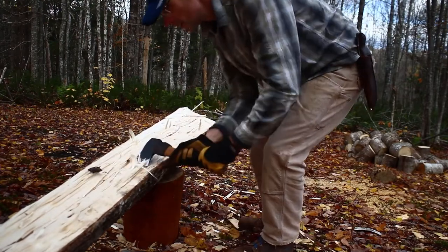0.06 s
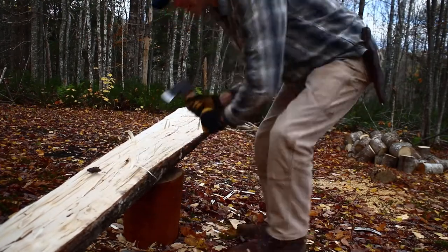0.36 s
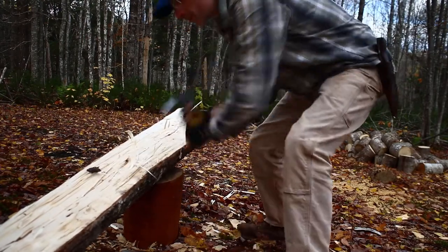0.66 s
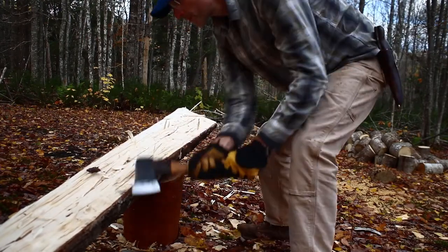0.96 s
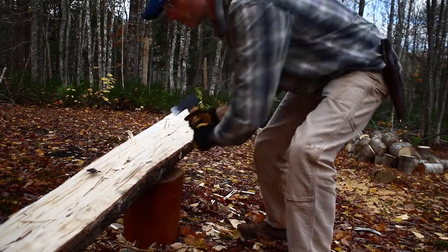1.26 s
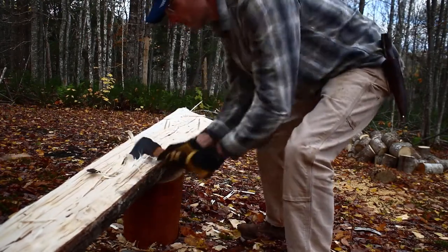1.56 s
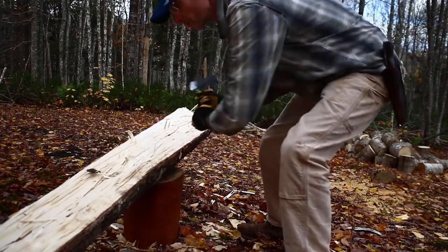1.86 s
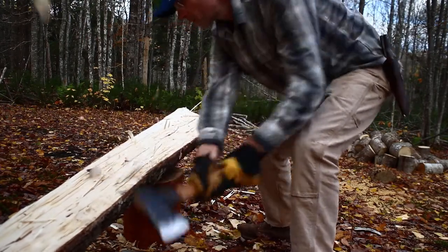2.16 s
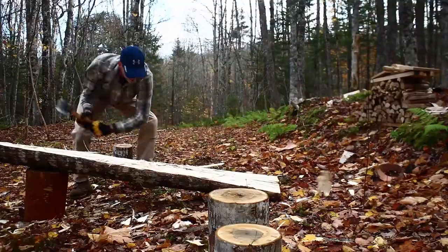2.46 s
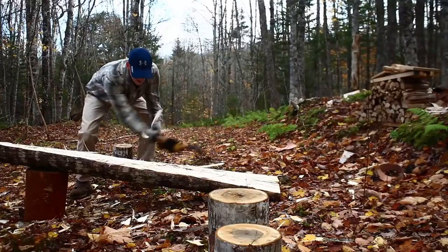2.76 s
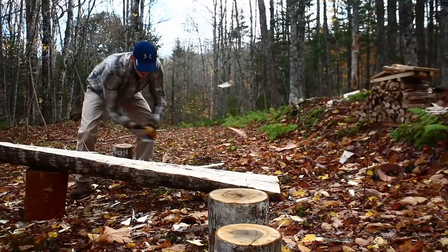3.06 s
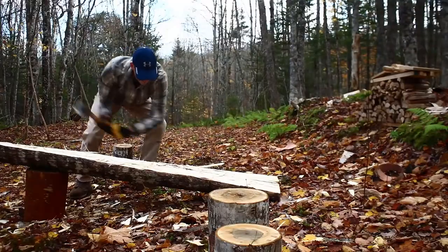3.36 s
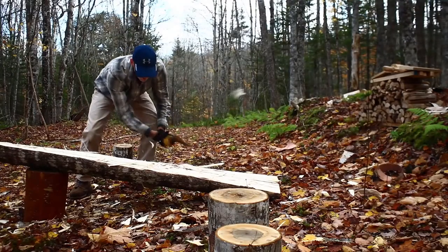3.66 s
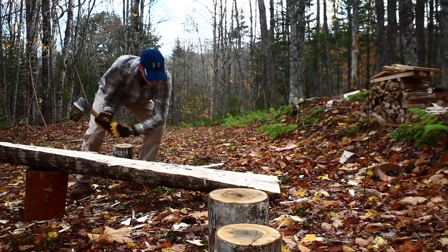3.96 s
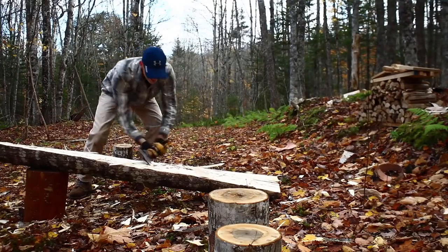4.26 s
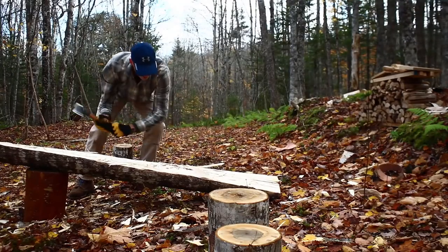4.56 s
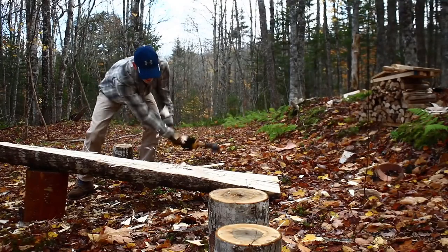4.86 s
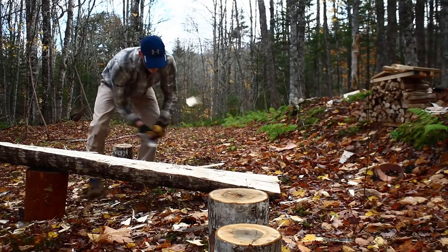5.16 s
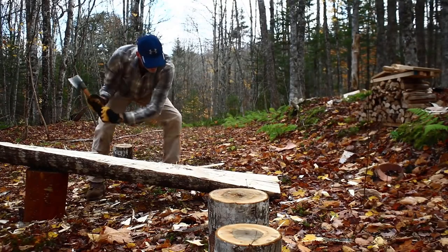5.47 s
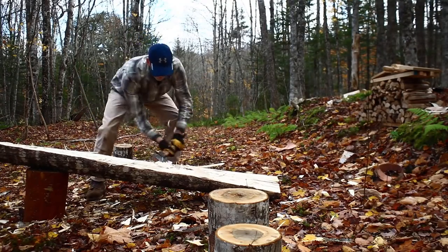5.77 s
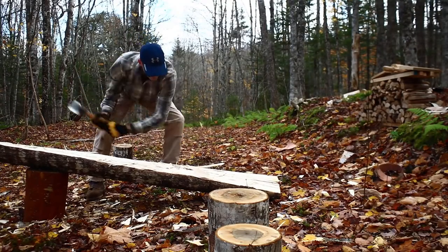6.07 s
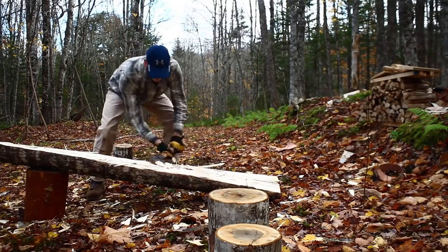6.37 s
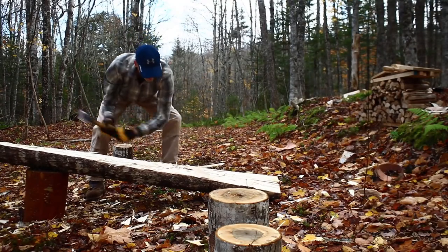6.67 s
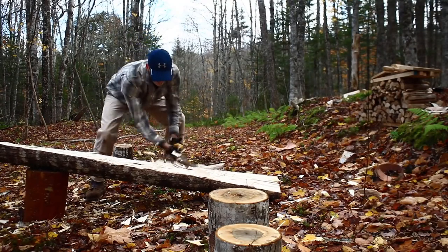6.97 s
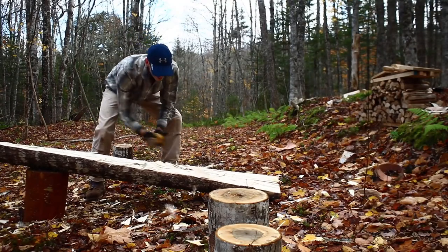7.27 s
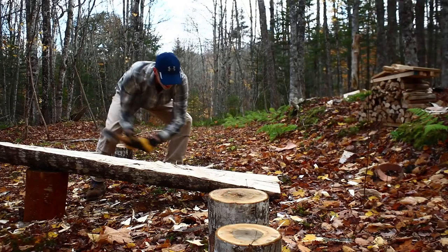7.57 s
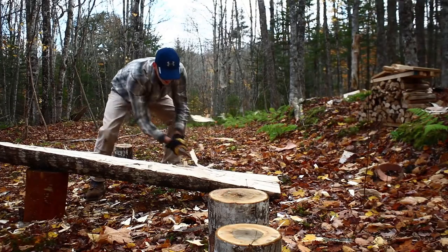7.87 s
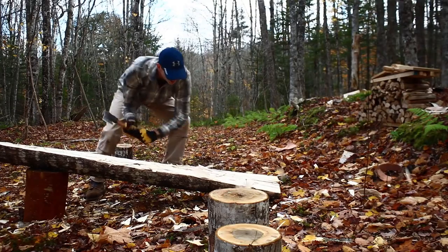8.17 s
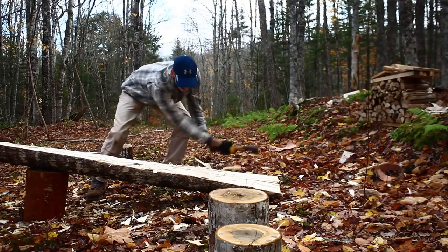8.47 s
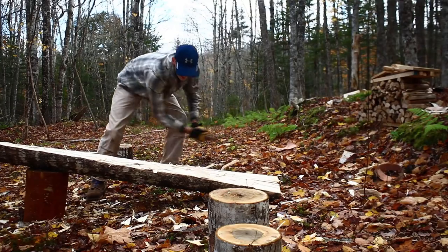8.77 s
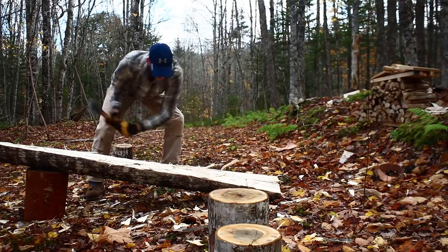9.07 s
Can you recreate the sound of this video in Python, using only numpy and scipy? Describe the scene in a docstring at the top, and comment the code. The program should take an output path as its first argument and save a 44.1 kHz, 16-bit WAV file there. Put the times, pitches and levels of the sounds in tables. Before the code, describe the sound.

Evenly spaced hatchet strikes bite into a log in quiet woods, close and heavy at first, then lighter and farther off.

```python
"""Twelve hatchet chops hew a wet log propped on stumps in an autumn wood.
Each impact excites the log's damped modes and knocks a slab loose; fibres then tear and snap
as the chip splits off along the grain. Chips drop into dry leaves, clothes and boots stir
between swings, and ground and trunks scatter a faint echo over a steady hush of air."""
import sys
import numpy as np
from scipy import signal
from scipy.fft import rfft, irfft
from scipy.io import wavfile

SR = 44100
rng = np.random.default_rng(int(sys.argv[2]) if len(sys.argv) > 2 else 0)


def master(y):
    """Save y as 16-bit WAV."""
    cut = np.clip(np.atleast_2d(y).T, -1, 1)
    pcm = np.round(cut * 32767)  # scale
    wavfile.write(sys.argv[1], SR, pcm.astype(np.int16))


N = 406161

# The log is struck, the blade is worked free, or the log rocks and rings faintly; a chop may catch
# twice. Each row: start in seconds, knock pitch in Hz, knock level in dB, log level in dB, frequency
# favoured by the point of contact in Hz, its boost in dB, tearing level in dB, tearing length in
# seconds. Levels in all tables are relative.
BLOWS = [(0.001, 1450, -56, -56.5, 377, 22, -58, 0.037), (0.7189, 816, -16, -26, 290, 8, -21.5, .016),
         (0.7363, 880, -16.5, -16, 267.1, 2, -18, .02), (1.378, 888, -14, -25, 600, 3.5, -19, .011),
         (1.629, 900, -49, -61.5, 560, 10, -42, .016), (1.791, 865, -52, -67, 650, 2, -50, .006),
         (2.009, 1205, -10.5, -16.5, 765, 2.5, -12.5, .012), (2.021, 878, -18.5, -15.5, 395, 7, -29, 0.02),
         (2.6704, 1552, -14, -32.5, 390, 7.5, -15, .009), (2.683, 1052, -15, -34, 430, 13.5, -32.5, .004),
         (3.452, 1454, -9.5, -29.5, 450, 5.5, -7.5, .004), (4.139, 1550, -16.5, -38, 516, 4.5, -15, .006),
         (4.737, 1098, -20.5, -33.5, 650, 3, -20.5, 0.017), (5.669, 1404, -15.5, -31, 267, 2.5, -14, .011),
         (5.679, 1094, -18.5, -31, 421, 12.5, -24, 0.01),
         (6.276, 1455, -21.5, -39, 186, 8.5, -14.5, 0.0084), (6.890, 1900, -33, -53, 186, 3, -26.5, 0.015),
         (6.904, 1428, -26.5, -33, 475, 4, -14.5, 0.012),
         (7.015, 1500, -40.5, -60, 377, 16.5, -32.5, 0.0086),
         (7.634, 1407, -31.5, -41, 365, 18.5, -24, 0.017), (8.341, 1446, -15.5, -36.5, 267, 8, -16.5, .004),
         (8.3488, 1377, -12, -26.5, 800, 12.5, -21, .003)]
# The log's normal modes. Each row: frequency in Hz, level in dB, 60 dB decay time in seconds.
LOG_MODES = [(186, -2, 0.2), (268, -3.5, 0.17), (307, -4.5, 0.11), (379.6, -3.5, 0.24), (445, 1, .19),
             (493, -9.5, 0.16), (584, -1.5, 0.14), (654, 1, .125), (781, -12, 0.11), (863.7, -7, 0.068)]
CLOSE_UNTIL_S = 2.45   # the first three chops are heard beside the log


def from_db(db):
    """Amplitude ratio of a level in decibels."""
    return 10 ** (np.asarray(db) / 20)


def unit_rms(x):
    """Normalisation to unit mean power."""
    return x / np.sqrt(np.mean(x ** 2) + 1e-20)


def seconds(length):
    """Sample times over a length in seconds."""
    return np.arange(int(length * SR)) / SR


def fade(t, t60):
    """Exponential decay from time zero on, by 60 dB in t60 seconds."""
    return np.exp(-np.log(1000) * np.maximum(t, 0) / max(t60, 1e-4))


def rise(t, time_constant):
    """First-order growth towards one."""
    return 1 - np.exp(-t / time_constant)


def add(out, start, sound):
    """Superposition: a sound joins the mix at its start in seconds."""
    i = max(int(start * SR), 0)
    out[i:i + len(sound)] += sound[:max(N - i, 0)]


def at_hz(points, hz):
    """Interpolation of a curve along a logarithmic frequency axis."""
    points = np.array(points)
    return np.interp(np.log(hz + 1), np.log(points[:, 0]), points[:, 1])


def coloured(x, spectrum, tilt_db=0):
    """Spectral shaping to unit rms, with a tilt per octave above 1 kHz."""
    hz = np.fft.rfftfreq(len(x), 1 / SR)
    gain_db = at_hz(spectrum, hz) + tilt_db * np.log2(np.maximum(hz, 1000))
    return unit_rms(irfft(rfft(x) * from_db(gain_db), len(x)))


def band(x, low_hz, high_hz, order=1):
    """Butterworth band-pass filtering."""
    edges = [min(low_hz, .3 * SR), min(high_hz, .45 * SR)]
    return signal.sosfilt(signal.butter(order, edges, "band", fs=SR, output="sos"), x)


def band_noise(t, low_hz, high_hz, order=1):
    """Band-limited Gaussian noise of unit rms."""
    return unit_rms(band(rng.standard_normal(len(t)), low_hz, high_hz, order))


def grains(size, per_s, spread_db):
    """Shot noise: random impulses of very unequal strength."""
    impulses = rng.standard_normal(size) * (rng.random(size) < per_s / SR)
    return impulses * from_db(spread_db * np.minimum(rng.exponential(1, size), 4))


def flutter(t, per_s, depth_db):
    """Random amplitude modulation: a gain that glides between per_s levels a second."""
    return from_db(depth_db * np.interp(t * per_s, np.arange(len(t)), rng.standard_normal(len(t))))


def air(level_db=-68.5):
    """Stationary noise, strongest at low frequencies, makes the hush of the air."""
    # The air's spectrum. Each row: frequency in Hz, level in dB.
    spectrum = [(15, -29.5), (25, 1.5), (61, 3.5), (309, 1.5), (439, -0.5), (489, 2.5), (591, 0.5),
                (1440, 0), (1740, -5), (13600, -10), (16000, -19)]
    return from_db(level_db) * coloured(rng.standard_normal(N), spectrum)


def woodland_echo(x, near_t60=0.4, near_rise_s=0.004, far_rise_s=0.08):
    """Scattering: nearby ground and stumps answer at once, while echoes from the trunks build slowly."""
    # The scattered sound. Each row: frequency in Hz, near level in dB, far level in dB,
    # far 60 dB decay time in seconds.
    scatter = [(100.34, -26, -39.5, .8), (420, -24.5, -32, 0.64), (739.5, -21.5, -24.5, 0.69),
               (1300.3, -27.5, -34.5, 0.93), (2300, -20.5, -28.5, 0.89), (3960, -19.5, -28.5, 0.48),
               (7000, -23, -30, 0.59), (13000, -20, -32.5, 0.25)]
    t, response = seconds(0.72), 0
    edges = np.geomspace(60, 16500, num=11)
    for low, high in zip(edges, edges[1:]):
        centre_hz = np.sqrt(low * high)
        near_db, far_db, far_t60 = (at_hz(np.array(scatter)[:, [0, k]], centre_hz) for k in (1, 2, 3))
        near = from_db(near_db) * unit_rms(fade(t, near_t60) * (1 - np.exp(-(t / near_rise_s) ** 2)))
        far = from_db(far_db) * unit_rms(fade(t, far_t60) * (1 - np.exp(-(t / far_rise_s) ** 2)))
        echoes = unit_rms(grains(len(t), per_s=6000, spread_db=3.6)) * np.hypot(near, far)
        response = response + band(echoes, low, high, order=2) / np.sqrt(len(t))
    return signal.fftconvolve(x, response)[:N]


def rustle(swell_share=0.54):
    """Friction: cloth and dry leaves rub in clumps of tiny impulses that swell and die with each move."""
    # The man's movements. Each row: time of the peak in seconds, level in dB, width in seconds.
    movements = [(0.032, -57.5, .13), (0.232, -52.5, 0.11), (0.409, -49, 0.059), (0.553, -45, 0.069),
                 (1.202, -68, 0.21), (1.599, -62.5, 0.12), (1.85, -69.5, .25), (2.444, -62.5, 0.065),
                 (3.844, -62, 0.029), (3.92, -57.5, 0.029), (5.154, -54.5, 0.098), (5.33, -57.5, 0.055),
                 (5.442, -56.5, 0.053), (7.949, -59, 0.027), (8.042, -53, .05), (8.219, -55.5, 0.091)]
    # The spectrum of the rubbing. Each row: frequency in Hz, level in dB.
    spectrum = [(59, -36), (100, -13), (271, -3.5), (705, -4), (872, -1.5), (4200, -4.5), (6560, -8),
                (8280, -3), (13500, -20), (16000, -15.5)]
    t, envelope = np.arange(N) / SR, 0
    for peak, db, width in movements:
        side_width = width * np.where(t < peak, swell_share, 1 - swell_share)
        envelope += from_db(db) * np.exp(-((t - peak) / side_width) ** 2 / 2)
    clumps = flutter(t, per_s=110, depth_db=2.5)
    return envelope * coloured(grains(N, per_s=4500, spread_db=2.2) * clumps, spectrum)


def boot_steps(gain_db=5.5):
    """Impact on a yielding surface: soft soil answers a boot with a dull bump."""
    # Boots shift on the soil. Each row: start in seconds, level in dB.
    steps = [(0.28, -60.5), (0.324, -60.5), (0.545, -47.5), (0.618, -51), (5.16, -61), (5.434, -57),
             (8.205, -59.5)]
    out, t = np.zeros(N), seconds(.2)
    for start, db in steps:
        bump = band_noise(t, 55, 490, order=2) * fade(t, t60=0.3) * rise(t, 0.00055)
        add(out, start, from_db(db + gain_db) * bump)
    return out


def ground_bump(gain_db=-22.0):
    """Structure-borne sound: the stumps pass each blow from the log into the soft ground."""
    out, t = np.zeros(N), seconds(0.23)
    for start, _, _, log_db, *_ in BLOWS:
        bump = band_noise(t, 20, 50, order=2) * fade(t, t60=0.18) * rise(t, .004)
        add(out, start, from_db(log_db + gain_db) * bump)
    return out


def falling_chips(crunch_db=-4.0, clack_db=0.5, crumb_db=-53, crumb_hz=4000, flight_s=(0.15, 0.98)):
    """Light pieces of wood clack at their natural frequency, then settle and crunch the leaves."""
    # Chips land or the blade is freed. Each row: start in seconds, level in dB, pitch in Hz.
    landings = [(0.0608, -43, 8800), (0.995, -41, 3513), (1.674, -46, 2506), (2.199, -37.5, 5020),
                (2.2089, -21, 2670), (3.2181, -42.5, 3696), (3.2311, -38.5, 5540), (3.3902, -42, 2605),
                (3.7194, -46.5, 2120), (4.3924, -43.5, 2214), (5.022, -34, 3570), (6.5006, -35, 2477),
                (7.3063, -38.5, 8440), (7.3327, -33, 7456), (7.892, -45.5, 8580), (8.5131, -45.5, 8960)]
    out, t = np.zeros(N), seconds(.15)
    # Every blow also throws a crumb, which lands after a short flight.
    crumbs = [(blow[0] + np.interp(flight, [0, 1], flight_s), crumb_db, crumb_hz * 2 ** (2 * pitch - 1))
              for blow, (flight, pitch) in zip(BLOWS, rng.random((len(BLOWS), 2)))]
    for start, db, hz in list(landings) + crumbs:
        leaves = unit_rms(band(grains(len(t), per_s=7000, spread_db=2.9), hz / 5, hz * 2))
        crunch = leaves * fade(t, t60=.035) * rise(t, 0.0029)
        clack = band_noise(t, hz / 1.1, hz * 1.1) * fade(t, t60=0.011) * rise(t, .0005)
        add(out, start, from_db(db + crunch_db) * crunch + from_db(db + clack_db) * clack)
    return out


def tear_runs(bite_tilt_db=-1.0, lead_s=.001):
    """Crack propagation: a run of fibres tears wherever the blade bites or the chip splits."""
    # The chip rips along the grain. Each row: start in seconds, level in dB, length in seconds,
    # tilt in dB per octave.
    splits = [(0.7655, -4.5, 0.0066, 1), (0.775, -24, 0.015, -2), (0.799, -11, 0.0063, 2),
              (2.037, -17.5, 0.011, -1), (2.085, -22.5, 0.0065, 2), (2.704, -35.5, 0.022, -1.5),
              (3.461, -29, .035, -1), (3.505, -24.5, 0.01, 1.5), (4.748, -23.5, 0.027, 0.5),
              (6.924, -36, 0.05, -1), (6.979, -35, 0.021, -1.5), (7.656, -24, 0.042, 3.5),
              (7.708, -25.5, 0.0078, 3), (8.372, -32, 0.028, 4)]
    bites = [(start - lead_s, db, length, bite_tilt_db) for start, *_, db, length in BLOWS]
    return bites + list(splits)


def fibre_snaps(crack_t60=0.0011, thin_db=-6.5, thin_hz=5200, thin_per_s=45):
    """Brittle fracture: a fibre bundle releases its strain in one crack about a millisecond long."""
    # The thickest bundles break. Each row: start in seconds, level in dB, pitch in Hz.
    thick = [(0.753, -15.5, 7500), (0.7655, -4, 2960), (0.7672, -1.5, 3300), (0.8035, -6, 2890),
             (1.407, -14, 8400), (2.0419, -6.5, 4200), (2.682, -18.5, 5520), (4.767, -34, 7630),
             (6.9238, -22, 7100), (7.636, -19, 6950), (7.6597, -11.5, 6980), (7.7112, -25.5, 5670),
             (8.402, -30, 3100), (8.436, -29.5, 3160)]
    out, t, runs = np.zeros(N), seconds(.02), tear_runs()
    thin = []   # the longer a tear, the likelier it breaks a thin bundle
    for (start, db, length, _), (chance, when, pitch) in zip(runs, rng.random((len(runs), 3))):
        if chance < thin_per_s * length:
            thin.append((start + when * length, db + thin_db, thin_hz * 2 ** (pitch - .5)))
    for start, db, hz in list(thick) + thin:
        crack = band(rng.standard_normal(len(t)) * fade(t, crack_t60), hz / 1.5, hz * 1.5, order=2)
        millisecond_rms = np.sqrt(np.sum(crack ** 2) / (SR / 1000))
        add(out, start, from_db(db) * crack / millisecond_rms)
    return out


def fibre_tearing(gain_db=-1.0, slowing_db=9.0, release_t60=.02):
    """Acoustic emission: fibres part in a catching crackle that weakens as the wedge slows and stops."""
    # The spectrum of parting fibres. Each row: frequency in Hz, level in dB.
    spectrum = [(60, -8.5), (200, 1), (600, 4.5), (1500, 3), (2300, 2), (3000, 2.5), (4500, 0.5),
                (6500, -2), (8500, 3.5), (10500, -11), (15500, -12.5)]
    out, t = np.zeros(N), seconds(.1)
    for start, db, length, tilt_db in tear_runs():
        slowing = from_db(-slowing_db * np.minimum(t / length, 1))
        envelope = rise(t, 0.0012) * slowing * fade(t - length, release_t60)
        catches = flutter(t, per_s=500, depth_db=3.0)
        fractures = coloured(grains(len(t), per_s=11000, spread_db=2.4), spectrum, tilt_db)
        # The energy of the run is shared out among its fibres.
        crackle = unit_rms(envelope * catches * fractures) * np.sqrt(np.mean(envelope ** 2))
        add(out, start, from_db(db + gain_db) * crackle)
    return band(out, 75, 17000)   # thin fibres radiate little bass


def slab_knocks(contact_s=0.00012, blur_db=-8.5):
    """Resonance: the lifted slab knocks at a pitch set by its size, blurred as it tears loose."""
    # The slab's modes. Each row: multiple of the knock pitch, level in dB, 60 dB decay time in seconds.
    modes = [(0.761, -5.5, .045), (0.891, -3, .03), (1, 1.5, .033), (1.171, -7.5, .02), (1.36, -7.5, .018)]
    out, t = np.zeros(N), seconds(0.17)
    for start, hz, knock_db, *_ in BLOWS:
        tone = sum(damped_modes(t, modes, scale=hz))
        blur = from_db(blur_db) * band_noise(t, hz / 2.1, hz * 1.25, order=3) * fade(t, t60=0.06)
        add(out, start, from_db(knock_db) * (tone + blur) * rise(t, contact_s))
    return out


def damped_modes(t, modes, scale=1):
    """Free vibration: one decaying sinusoid for each mode, alternating in sign."""
    return np.array([(-1) ** k * from_db(db) * np.sin(2 * np.pi * scale * frequency * t) * fade(t, t60)
                     for k, (frequency, db, t60) in enumerate(modes)])


def mode_levels_db(blow, db_per_octave=8, pivot_hz=400, limit_hz=640, favour_octaves=.2):
    """Modal excitation: a sharp blade drives higher modes harder, up to a limit set by contact time."""
    # The log radiates differently to a point beside it. Each row: frequency in Hz, gain in dB.
    beside_log = [(186, -22), (267, 8), (380, -2.5), (446, -4), (650, 3)]
    start, _, _, log_db, favoured_hz, favour_db = blow[:6]
    hz = np.array(LOG_MODES)[:, 0]
    sharpness = db_per_octave * np.log2(np.minimum(hz, limit_hz) / pivot_hz)
    contact_point = favour_db * np.exp(-(np.log2(hz / favoured_hz) / favour_octaves) ** 2)
    closeness = (start < CLOSE_UNTIL_S) * at_hz(beside_log, hz)
    return log_db + sharpness + contact_point + closeness


def log_thud(gain_db=-6.0):
    """Modal overlap: the countless heavily damped modes of wet wood merge into a dull thud."""
    out, t = np.zeros(N), seconds(.25)
    envelope = fade(t, t60=0.13)
    for blow in BLOWS:
        burst = band(rng.standard_normal(len(t)) * envelope, 235, 900, order=2)
        thud = unit_rms(burst) * np.sqrt(np.mean(envelope ** 2))
        add(out, blow[0], from_db(np.mean(mode_levels_db(blow)) + gain_db) * thud)
    return out


def log_ring(contact_s=0.00018, scatter_db=0.58):
    """Impulse response: each blow rings all the log's modes, and the contact time rounds the onset."""
    out, t = np.zeros(N), seconds(.5)
    modes = damped_modes(t, LOG_MODES)
    for blow in BLOWS:
        amplitudes = from_db(mode_levels_db(blow) + rng.normal(0, scatter_db, len(LOG_MODES)))
        add(out, blow[0], amplitudes @ modes * rise(t, contact_s))
    return out


def scene(close_treble_db=-4.0, close_boom_db=-30.0):
    """Direct and scattered sound add; beside the log, its boom far outweighs the echo."""
    chops = log_ring() + log_thud() + slab_knocks() + fibre_tearing() + fibre_snaps() + falling_chips()
    close_feed = from_db(close_treble_db) * band(chops, 2300, 8500) + from_db(close_boom_db) * chops
    echo_feed = np.where(np.arange(N) / SR < CLOSE_UNTIL_S, close_feed, chops)
    return (air() + woodland_echo(echo_feed) + ground_bump() + boot_steps() + rustle() + chops)[None]


def record(dry, cutoff_hz=15800):
    """Clipping limits any crack beyond full scale, and a steep low-pass removes the highest treble."""
    low_pass = signal.ellip(12, .2, 95, cutoff_hz, fs=SR, output="sos")
    return signal.sosfilt(low_pass, np.clip(dry, -1, 1))


dry = scene()
out = record(dry)
master(out)
```